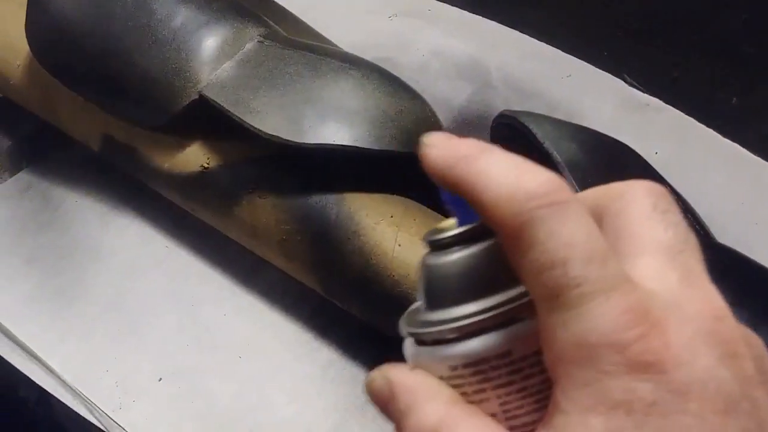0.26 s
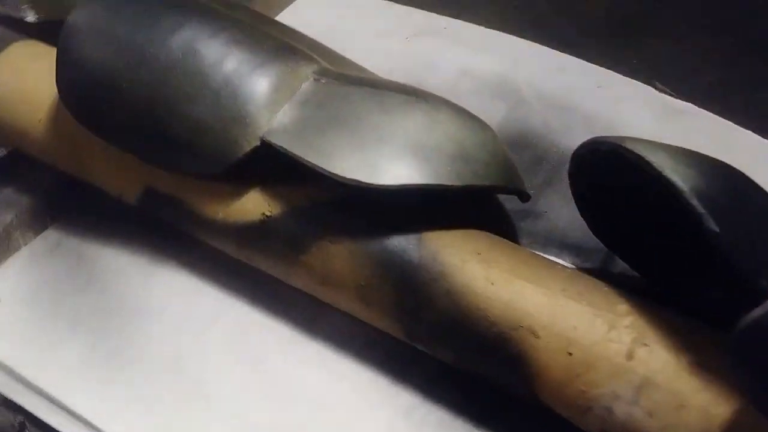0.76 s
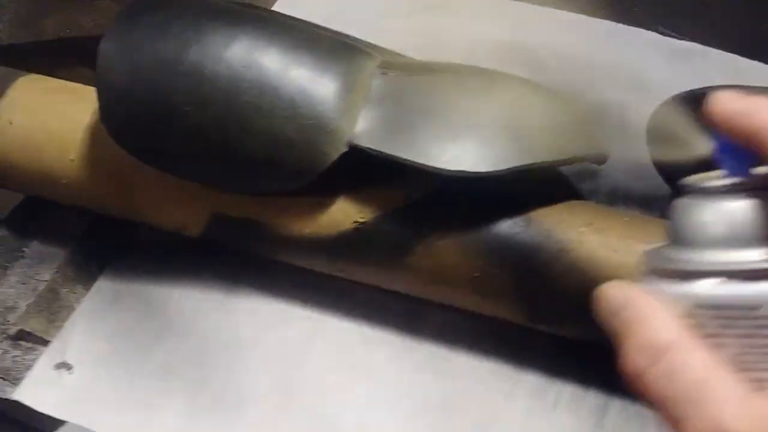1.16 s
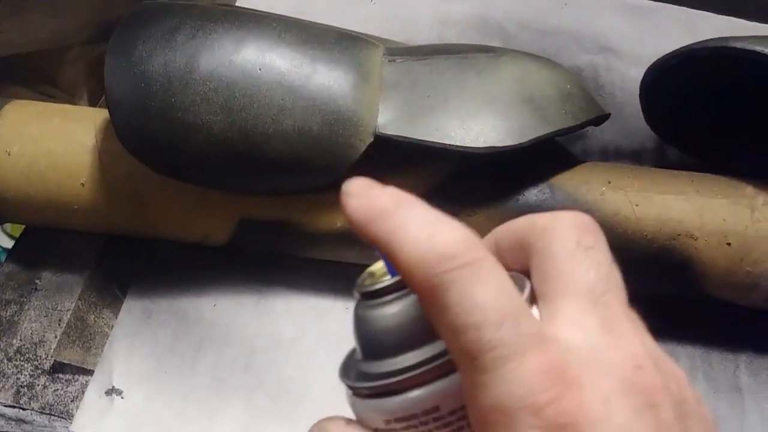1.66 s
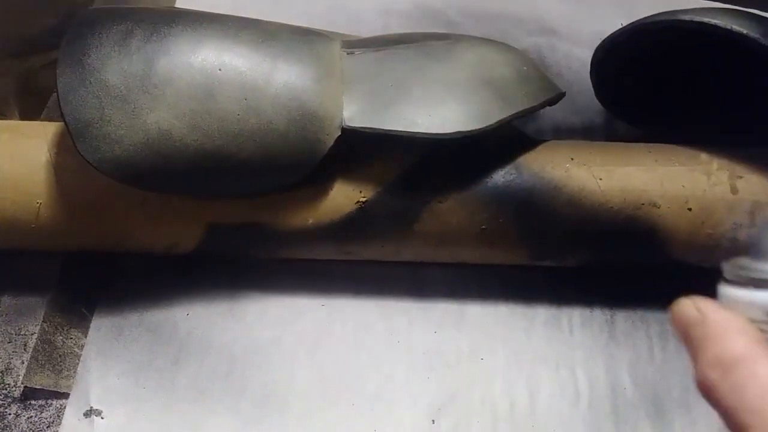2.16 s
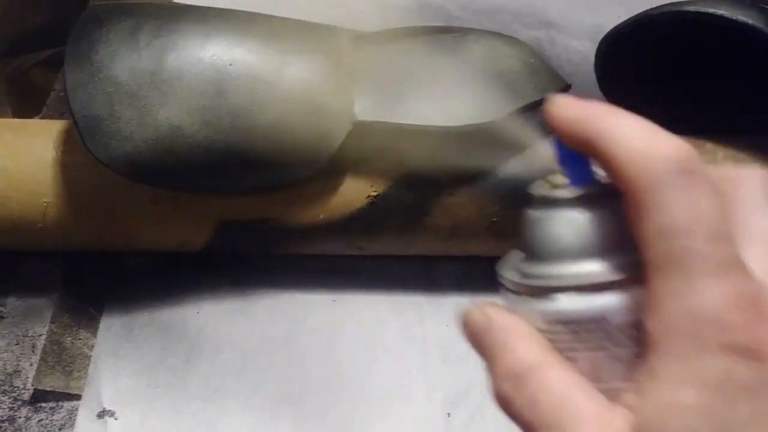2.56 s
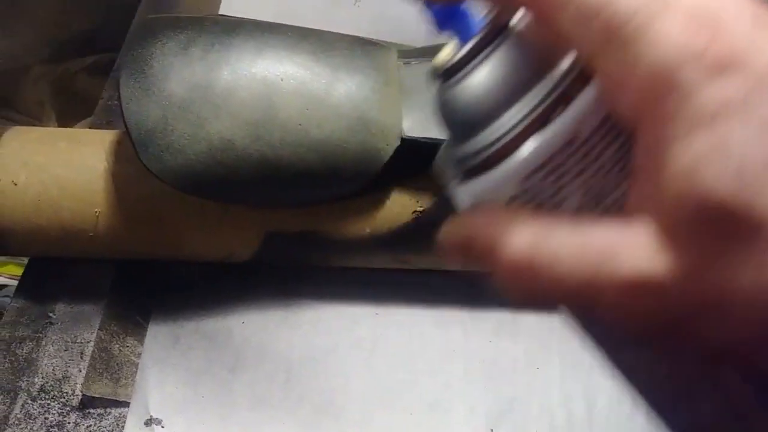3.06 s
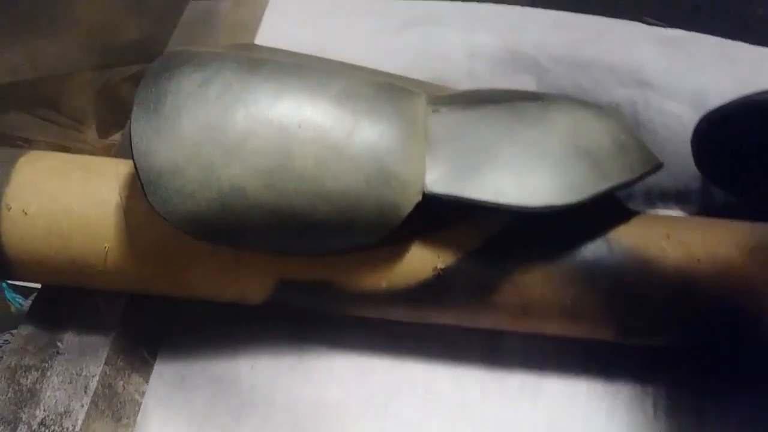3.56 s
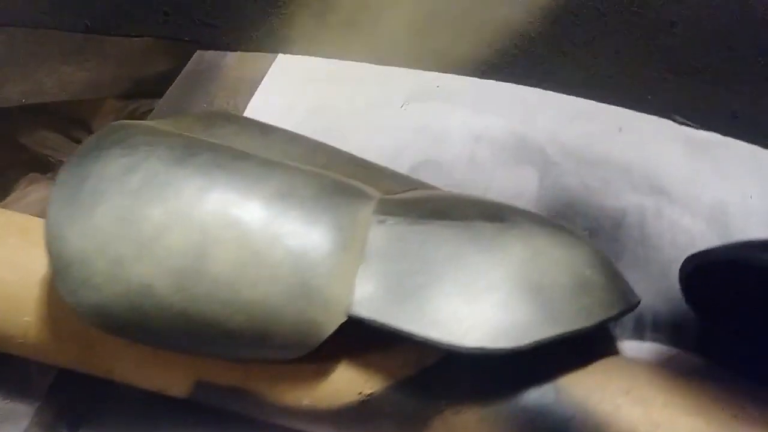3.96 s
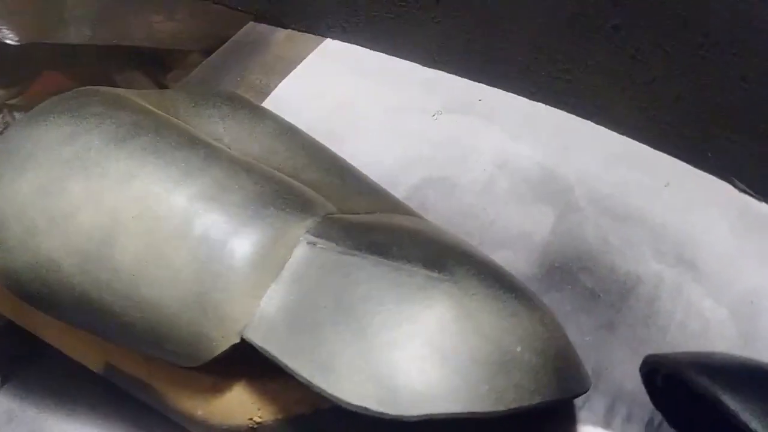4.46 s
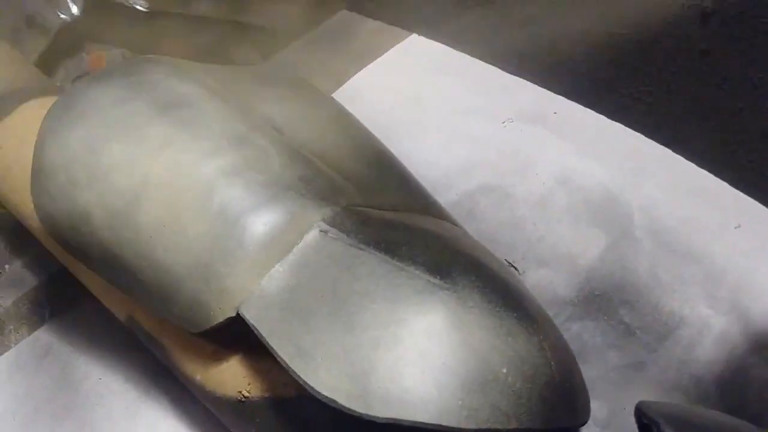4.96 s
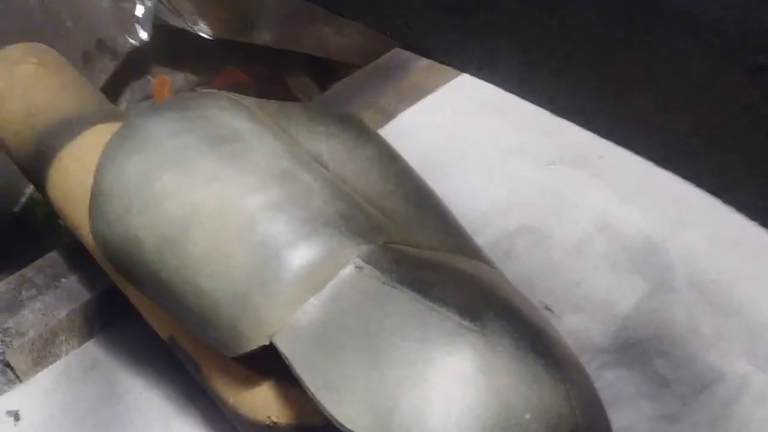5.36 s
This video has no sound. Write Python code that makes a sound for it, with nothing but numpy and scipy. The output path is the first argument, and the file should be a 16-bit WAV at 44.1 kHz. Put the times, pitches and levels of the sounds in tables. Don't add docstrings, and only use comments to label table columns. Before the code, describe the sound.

A close, mono small-camera sound in a workshop, with a faint low extractor rumble and hum throughout and soft far thuds at the start and around 3.2 to 3.8 s. A spray is already running and stops with a spit at 0.15 s. Further bright, smooth hisses run at about 0.45-0.8, 1.15-1.5, 1.8-2.2, 2.6-2.9, 3.3-3.7, 4.0-4.3 and 4.8-5.1 s. Most open with a louder wet burst and shut with a brief spit; the tone shifts subtly as the hand moves near surfaces. Short room tails are cut off quickly. In the gaps the mixing ball ticks and rolls faintly, with one sharper tick at 3.94 s. Coarse gassy sputtering comes at 4.2 s and again around 4.8-5.0 s. From 5.2 s the ball rolls, then strikes the steel can hard at 5.45-5.48 s, the loudest blow clipping, with a faint tap and a dry double knock near 5.6 s.

```python
import sys
import numpy as np
from scipy import signal
from scipy.fft import rfft, irfft, next_fast_len
from scipy.io import wavfile
from scipy.ndimage import uniform_filter1d, map_coordinates

SR = 44100
rng = np.random.default_rng(int(sys.argv[2]) if len(sys.argv) > 2 else 0)


def gain_from_decibels(decibels):
    exponent = np.asarray(decibels, float) / 20
    return 10 ** exponent


def file_out(sig):
    cols = np.atleast_2d(sig).T
    lim = np.clip(cols, -1, 1)
    pcm = np.round(lim * 32767).astype(np.int16)
    wavfile.write(sys.argv[1], SR, pcm)


N = 247401


def unit(x):
    return x / np.sqrt(np.mean(x ** 2) + 1e-20)


def along(points, hz):
    f, v = np.transpose(points)
    return np.interp(np.log(hz + 1), np.log(f + 1), v)


def wobble(rate):
    knots = rng.standard_normal(int(N * rate / SR) + 4)
    return map_coordinates(knots, [np.arange(N) * rate / SR])


def rush(spectrum, patchy_db=0., lumps=1, size=4):
    z = signal.stft(lumps * rng.standard_normal(N), nperseg=512)[2]
    field = uniform_filter1d(rng.standard_normal(z.shape), size, 0)
    field = uniform_filter1d(field, 8, 1)
    x = signal.istft(z * gain_from_decibels(patchy_db * unit(field)), nperseg=512)[1][:N]
    m = next_fast_len(N + 8192)
    colour = gain_from_decibels(along(spectrum, np.fft.rfftfreq(m, 1 / SR)))
    return unit(irfft(rfft(x, m) * colour, m)[:N])


def spans(tables, order):
    t, gain = np.arange(N) / SR, np.zeros(N)
    for rows in tables:
        inside = (t > rows[0][0]) * (t < rows[-1][0])
        gain += gain_from_decibels(np.interp(t, *np.transpose(rows)[[0, order]])) * inside
    return gain


def bursts(peaks, rise, hold, t60):
    sag_db_per_s = 249
    out = np.zeros(N)
    for (s, db), up, stay, _ in zip(peaks, *np.broadcast_arrays(rise, hold, np.zeros(len(peaks)))):
        near = np.arange(max(round((s - up) * SR), 0), min(round((s + .7) * SR), N))
        age = near / SR - s
        swell_db = -24 * np.clip(-age / up, 0, 1)
        sag_db = -sag_db_per_s * np.clip(age, 0, stay)
        decay_db = -60 * np.clip(age - stay, 0, 1) / t60
        out[near] += gain_from_decibels(db + swell_db + sag_db + decay_db)
    return out


# (frequency [Hz], density [dB per Hz])
FAN_RUMBLE = [(25, -56.5), (60, -24), (95, -21), (122, -11.5), (155, -18), (200, -3), (255, -14.5),
              (310, -21.5), (400, -36), (1200, -48), (3500, -45), (6400, -55.5), (12700, -56), (13200, -93)]
# (frequency [Hz], level [dB])
MAINS_HUM = (120, -64)


def fan():
    t = np.arange(N) / SR
    hum_hz, hum_db = MAINS_HUM
    blade_hz, blade_db = 206, -71
    hum = gain_from_decibels(hum_db + 1.5 * wobble(12)) * np.sin(2 * np.pi * hum_hz * t + .3 * wobble(13))
    blade = gain_from_decibels(blade_db + 3 * wobble(8)) * np.sin(2 * np.pi * blade_hz * t + 1.5 * wobble(15))
    return gain_from_decibels(-58) * rush(FAN_RUMBLE, patchy_db=2.5, size=1) + hum + blade


# (time [s], level [dB])
THUD_TIMES = [(0.0, -65), (3.16, -63), (3.43, -67), (3.53, -61), (3.76, -65)]
# (frequency [Hz], density [dB per Hz])
THUD_BODY = [(480, -54), (560, -3.5), (610, 4.5), (660, -29), (740, -71)]


def thuds():
    rise_s, t60_s = .02, 0.087
    return bursts(THUD_TIMES, rise_s, 0, t60_s) * rush(THUD_BODY)


# (open [s], shut [s], hiss level [dB], low leak let through [dB], room tail let through [dB])
PRESSES = [(-.1, 0.155, -42.5, -14, 2.5), (0.452, 0.819, -42.5, 0.5, 2), (1.146, 1.524, -41.5, 1, -1.7),
           (1.825, 2.224, -42, 1, -2.5), (2.599, 2.913, -43, -1.3, 1), (3.272, 3.674, -43.5, -2, 1),
           (3.98, 4.282, -44, -3.5, -2.4), (4.795, 5.117, -41.5, -21, -1.3)]


def valve():
    t, gain = np.arange(N) / SR, np.zeros(N)
    for on, off, db, _, _ in PRESSES:
        opening = np.clip((t - on + .002) / 0.0094, 0, 1) ** 1.5
        closing = np.clip((off - t + 0.001) / 0.011, 0, 1)
        dip_db = -4 * np.exp(-((t - off + .024) / .005) ** 2)
        gain += opening * closing * gain_from_decibels(db + dip_db)
    return gain


def passed(order):
    rows = np.array(PRESSES)
    return gain_from_decibels(rows[np.searchsorted(rows[1:, 0] - .02, np.arange(N) / SR), order])


# (frequency [Hz], density [dB per Hz])
JET_COLOUR = [(790, -39.5), (1350, -8.5), (1930, -2.5), (2500, -4.5), (3510, -1.5), (4010, -4.5), (4920, 2),
              (5680, -9.5), (6630, -14), (8570, -10), (9790, -18), (12400, -15.5), (15100, -11),
              (15700, -13.5)]


def hiss():
    jet = rush(JET_COLOUR, patchy_db=0.5, lumps=gain_from_decibels(0.73 * wobble(250)))
    return valve() * gain_from_decibels(2.3 * wobble(12)) * jet


SURFACES = [
    (.4, .2),
    (1, .32),
    (2, .42),
    (2.9, .22),
]
# (time [s], round trip to the tube [ms])
HAND_PATH = [(-.1, 1.1), (.163, 1.09), (.452, 1.12), (.816, 0.98), (1.152, 1.155), (1.515, 1.36),
             (1.825, 1.165), (2.219, 0.93), (2.606, 1.01), (2.908, 1.54), (3.275, 1.3), (3.666, 1.01),
             (3.979, 1.33), (4.291, 1.52), (4.799, 1.41), (5.124, 0.97)]


def nearby(x):
    path_ms = np.interp(np.arange(N) / SR, *np.transpose(HAND_PATH))
    out = x.copy()
    for multiple, gain in SURFACES:
        delay = (multiple * path_ms + .05 * wobble(4)) * SR / 1000
        out += gain * map_coordinates(x, [np.arange(N) - delay], order=3)
    return out / np.sqrt(1 + sum(g * g for _, g in SURFACES))


# (frequency [Hz], t60 [s])
ROOM_DECAY = [(500, 0.34), (2000, 0.6), (5000, 0.33), (12000, 0.3)]


def shop(x, knee=0.12):
    hz, t, z = signal.stft(x, SR, nperseg=256)
    lag = t[:150] - .004
    decay_db = -60 * lag / along(ROOM_DECAY, hz)[:, None] - 140 * np.clip(lag - knee, 0, 1)
    fall = (lag > 0) * gain_from_decibels(2 * decay_db)
    fall = fall / fall.sum(axis=1, keepdims=True)
    power = uniform_filter1d(abs(z) ** 2, size=3, axis=0)
    energy = signal.fftconvolve(power, fall, axes=1)[:, :len(t)]
    air = signal.stft(rush([(20, 0)], patchy_db=-0.5, size=2), SR, nperseg=256)[2]
    air = air / np.sqrt(np.mean(abs(air) ** 2))
    return signal.istft(np.sqrt(abs(energy)) * air, SR, nperseg=256)[1][:N]


# (frequency [Hz], density [dB per Hz])
LEAK_BANDS = [
    [(400, -60), (470, -8), (600, 0), (680, -6), (740, -60)],
    [(660, -60), (730, 0), (950, 0), (1030, -60)],
    [(900, -60), (990, 0), (1300, 0), (1420, -60)],
]
# (share of a spit [dB], t60 while the jet runs [s], resting leak [dB])
LEAK_RULE = [(-54, 0.17, -92), (-33, 0.43, -92), (-34, .5, -92.5)]
JET_LEAK_DB = [-61, -46, -34]


def leaks():
    shut_t60_s, flicker_db = 0.15, 6
    first, last = np.array(OPEN_SPITS), np.array(SHUT_SPITS)
    flow, share, out = valve(), passed(order=3), np.zeros(N)
    shut = bursts(last[:, :2], SHUT_RISE_S, last[:, 2], shut_t60_s)
    for band, (spit_db, t60, rest_db), jet_db in zip(LEAK_BANDS, LEAK_RULE, JET_LEAK_DB):
        opened = bursts(first[:, :2], first[:, 2], 0, t60) * (flow > 0)
        driven = gain_from_decibels(spit_db) * (opened + shut) + gain_from_decibels(jet_db) * flow
        fading = share * driven + gain_from_decibels(rest_db)
        out += fading * gain_from_decibels(flicker_db * wobble(9)) * rush(band, patchy_db=4.5, size=1)
    return out


# (peak time [s], peak level [dB], build-up [s])
OPEN_SPITS = [(.463, -26, .015), (1.159, -27, 0.016), (1.836, -23, 0.0032), (2.611, -27, .012),
              (3.289, -22.5, 0.0093), (3.987, -26.5, 0.016)]
# (peak time [s], peak level [dB], hold [s])
SHUT_SPITS = [(0.1393, -27, 0.0059), (.798, -31.5, 0.014), (1.5044, -28, 0.0075), (2.202, -31, 0.013),
              (2.8926, -30, 0.0099), (3.649, -32.5, .014), (5.1065, -30, 0.015)]
SHUT_RISE_S = 0.0028
# (frequency [Hz], density [dB per Hz])
SPIT_COLOUR = [(470, -53), (800, -22.5), (1300, -8.5), (1780, -3), (3190, -0.5), (3440, -2.5), (4750, 2),
               (5450, -5), (6250, -20.5), (7910, -17), (9780, -24), (15700, -43.5)]


def spit():
    open_hold_s, open_t60_s, shut_t60_s = 0.0023, 0.048, 0.043
    first, last = np.array(OPEN_SPITS), np.array(SHUT_SPITS)
    gain = bursts(first[:, :2], first[:, 2], open_hold_s, open_t60_s)
    gain += bursts(last[:, :2], SHUT_RISE_S, last[:, 2], shut_t60_s)
    return gain * rush(SPIT_COLOUR, patchy_db=1.5, lumps=gain_from_decibels(1.6 * wobble(400)))


# (time [s], frequency [Hz], peak level [dB], t60 [s])
TICKS = [(.272, 2850, -49.5, 0.085), (.352, 3600, -64, 0.096), (.352, 2820, -62, .08),
         (.935, 3064, -50.5, 0.57), (1.025, 3100, -42, .02), (1.095, 1170, -60, 0.19),
         (1.763, 3850, -57, 0.15), (1.763, 2190, -65, .1), (1.808, 1911, -63, .15), (2.415, 7800, -77, .06),
         (2.415, 4350, -70.5, .06), (2.508, 3450, -62.5, 0.097), (3.084, 2920, -65, 0.4),
         (3.145, 2880, -68.5, .3), (3.191, 3100, -70, 0.22), (3.22, 2930, -68, 0.86),
         (3.755, 2000, -64, 0.33), (3.79, 4250, -70, 0.4), (3.91, 3050, -67, .3), (3.93, 1344, -62, 0.36),
         (3.9415, 4380, -23.5, .005), (4.335, 4550, -65, .05), (4.4, 1810, -64, 0.33),
         (4.5, 4500, -74, 0.29), (4.63, 6300, -74.5, .1), (4.63, 5350, -77, 0.091), (4.755, 4250, -70, .2),
         (5.21, 8270, -71, 0.22), (5.269, 2750, -50, .3), (5.312, 4670, -52, 0.073)]


def ticks():
    out, age = np.zeros(N + SR), np.arange(SR // 2) / SR
    waver = np.pad(wobble(170), (0, SR))
    for s, hz, db, t60 in TICKS:
        i = round(s * SR)
        rise_s = 0.0083 * t60 + SR ** -.75
        swell = (1 - np.exp(-age / rise_s)) ** 2
        line = np.sin(2 * np.pi * hz * age + .95 * waver[i:i + len(age)])
        out[i:i + len(age)] += gain_from_decibels(db - 60 * age / t60) * swell * line
    return out[:N] * gain_from_decibels(2.5 * wobble(90))


# (time [s], level [dB], brightness [dB])
ROLLS = [
    [(1.021, -59.5, -34), (1.065, -55.5, -42), (1.1, -53.5, -40), (1.15, -62, -40)],
    [(3.943, -61, -10), (3.96, -65, -11), (3.978, -57, -18)],
    [(5.2, -56.5, -32), (5.23, -59, -30), (5.3, -57, -23), (5.325, -51, -22), (5.345, -53, -11),
     (5.365, -53, -21), (5.43, -57, 4.5), (5.448, -44, -17)],
]
# (frequency [Hz], density [dB per Hz])
ROLL_DULL = [(900, -60.5), (1300, -10), (1900, -4.5), (2800, -0.5), (3950, -5), (4250, -18), (5500, -55)]
ROLL_BRIGHT = [(3500, -42), (4500, 11), (5500, 9.5), (8000, -1), (10800, -7), (12000, -47)]
SKID_COLOUR = [(1100, -24), (1500, -11.5), (1900, 4), (2300, -7), (4500, -13.5), (6000, -48)]
# (time [s], level [dB])
SKIDS = [(1.025, -69), (2.272, -61.5), (5.232, -60), (5.324, -44.5), (5.336, -47), (5.426, -62)]


def roll():
    rise_s, hold_s, t60_s = 0.0033, 0.0032, 0.086
    grit = gain_from_decibels(2.5 * wobble(150))
    dull = rush(ROLL_DULL, patchy_db=4.5, lumps=grit, size=2)
    bright = rush(ROLL_BRIGHT, patchy_db=4.5, lumps=grit, size=2)
    skids = bursts(SKIDS, rise_s, hold_s, t60_s) * rush(SKID_COLOUR, lumps=grit)
    return spans(ROLLS, order=1) * (dull + spans(ROLLS, order=2) * bright) + skids


# (time [s], level [dB])
SPUTTERS = [
    [(4.194, -37.5), (4.2, -25), (4.24, -26.5), (4.265, -28.5), (4.271, -39), (4.281, -28), (4.29, -42),
     (4.297, -53)],
    [(4.772, -67), (4.785, -32.5), (4.792, -23), (4.81, -28), (4.885, -25.5), (4.93, -31), (4.975, -43.5),
     (5.04, -55)],
]
# (frequency [Hz], density [dB per Hz])
SPUTTER_COLOUR = [(210, -59), (350, -28), (474, -26), (1020, -16.5), (1210, -19.5), (1490, -5.5),
                  (1640, -7.5), (2680, -1), (3300, -8), (4680, 3), (6140, -21.5), (7080, -16.5),
                  (11400, -29.5), (15700, -30.5)]


def sputter():
    lumpy = rush(SPUTTER_COLOUR, patchy_db=1.5, lumps=gain_from_decibels(2.5 * wobble(160)))
    return spans(SPUTTERS, order=1) * lumpy


# (frequency [Hz], density [dB per Hz])
GULP_BODY = [(250, -48.5), (380, -18), (480, 3), (800, -6.5), (1300, 6.5), (1500, -49.5)]


def gulps():
    return gain_from_decibels(-20.5) * spans(SPUTTERS, order=1) * rush(GULP_BODY)


# (time [s], peak level [dB], low wall mode [dB], high clack [dB], clack t60 [s])
STRIKES = [
    (5.4492, -17, 14, -5, 0.04),
    (5.4662, 1.45, -14.5, -1.5, 0.02),
    (5.4738, -1.5, -29, -15, 0.0054),
    (5.4778, -15.5, 18, -14, 0.078),
    (5.564, -29, 6, -7, 0.062),
    (5.597, -1.5, -44, -37, 0.034),
    (5.603, -6, -44, -31, 0.014),
]
# (frequency [Hz], level [dB], t60 [s])
WALL_MODES = [(2000, -3.5, 0.025), (3230, -7, 0.01), (3710, -20, 0.061), (3940, 2.5, 0.025),
              (4660, -4, 0.012), (8400, -36.5, 0.03)]
# (frequency [Hz], density [dB per Hz])
CLACK_BODY = [(180, -54), (300, -30.5), (1020, -13), (1350, -16), (1800, -7), (2220, -4.5), (3820, 1),
              (7000, -33), (9100, -69), (15400, -120)]
CLACK_SNAP = [(4000, -37), (5500, -2), (8000, 9), (9500, -14.5), (15800, -20)]


def strikes():
    out, t = np.zeros(N + SR), np.arange(SR // 4) / SR
    clack, snap = np.pad(rush(CLACK_BODY), (0, SR)), np.pad(rush(CLACK_SNAP), (0, SR))
    contact = 1 - np.exp(-(t / 0.00056) ** 2)
    for s, db, low_db, high_db, t60 in STRIKES:
        rings = []
        for hz, mode_db, life in WALL_MODES:
            vary_db = 0.5 * rng.standard_normal()
            rings.append(gain_from_decibels(mode_db + vary_db - 60 * t / life) * np.sin(2 * np.pi * hz * t))
        i = round(s * SR)
        noise = clack[i:i + len(t)] + gain_from_decibels(high_db - 7.5) * snap[i:i + len(t)]
        noise = noise * (0.48 * gain_from_decibels(-60 * t / t60) + 0.044 * gain_from_decibels(-60 * t / 0.19))
        blow = gain_from_decibels(low_db) * rings[0] + 0.5 * sum(rings[1:]) + noise
        out[i:i + len(t)] += gain_from_decibels(db) * contact * blow
    thump = gain_from_decibels(-24) * t / 0.0009 * np.exp(1 - t / 0.00056)
    out[round(STRIKES[1][0] * SR):][:len(t)] += thump
    return out[:N]


def scene():
    spray = nearby(hiss() + spit() + sputter())
    can = ticks() + roll() + strikes()
    room = gain_from_decibels(-13) * passed(order=4) * shop(spray) + gain_from_decibels(-19.5) * shop(can)
    return (fan() + thuds() + spray + can + room + leaks() + gulps())[None]


def top_cut(x):
    return signal.sosfilt(signal.butter(12, 16690, fs=SR, output="sos"), x)


def record(dry):
    top_hz, slope_hz = 15950, 250
    m = next_fast_len(N + 8192)
    edge = np.clip((top_hz - np.fft.rfftfreq(m, 1 / SR)) / slope_hz, 0, 1)
    heard = irfft(rfft(dry, m) * np.sin(edge * np.pi / 2) ** 2, m)[:, :N]
    mix = heard / (1 + heard ** 6) ** (1 / 6)
    return top_cut(mix)


dry = scene()
out = record(dry)
file_out(out)
```